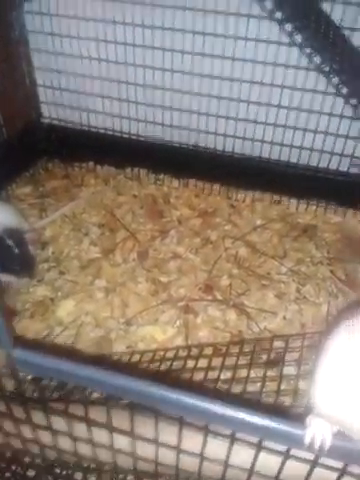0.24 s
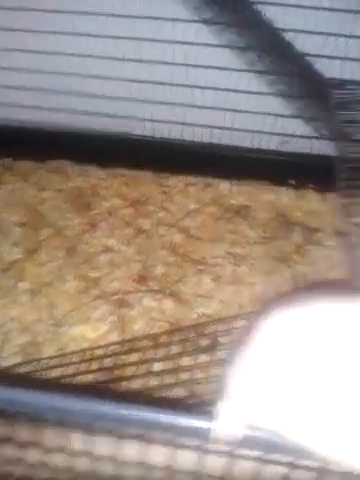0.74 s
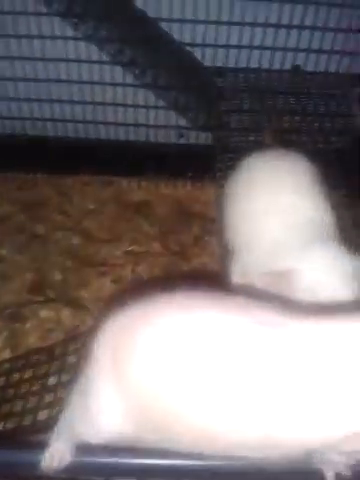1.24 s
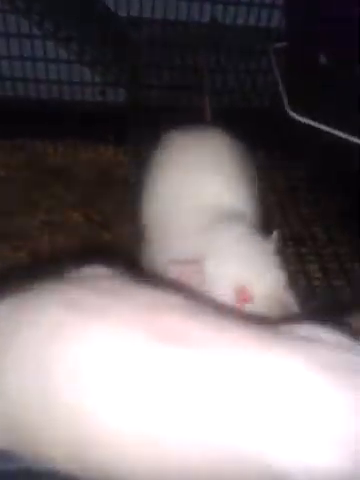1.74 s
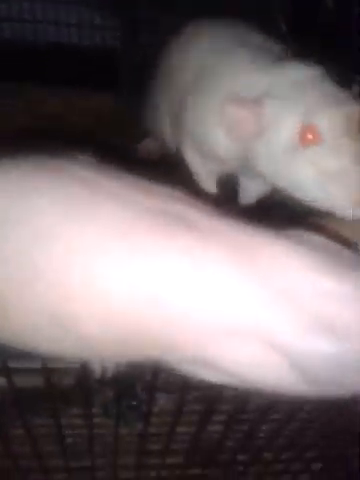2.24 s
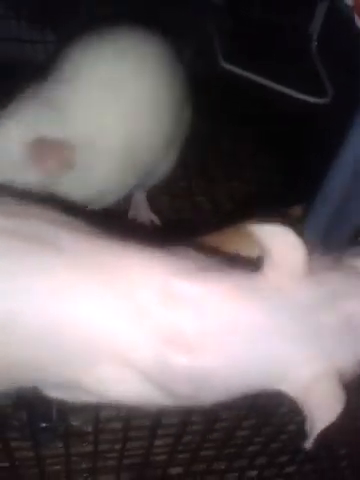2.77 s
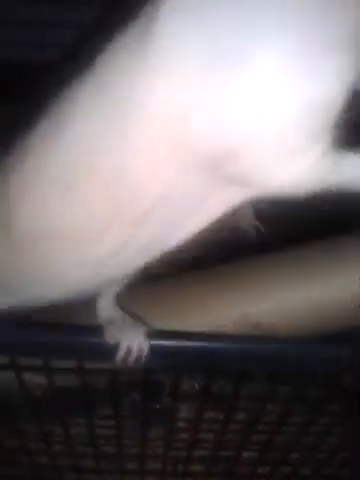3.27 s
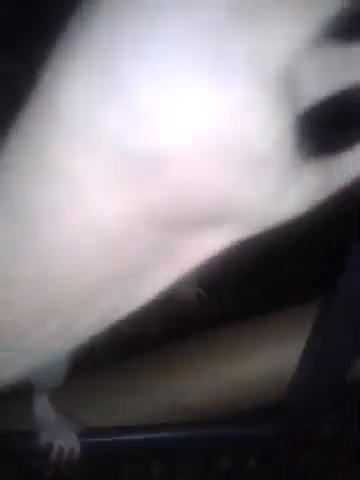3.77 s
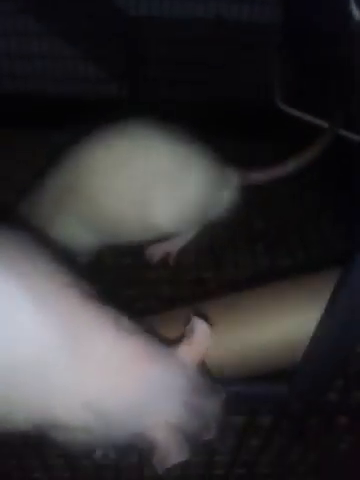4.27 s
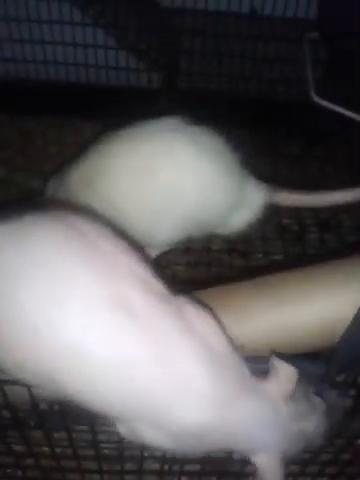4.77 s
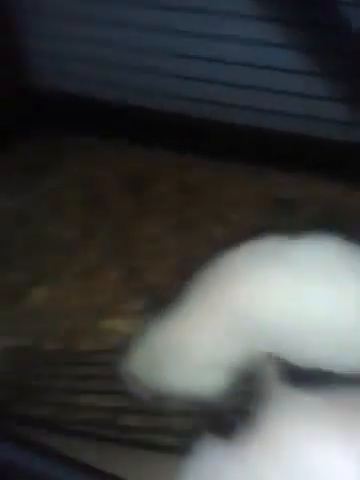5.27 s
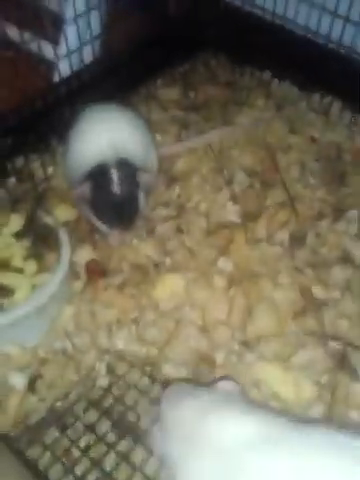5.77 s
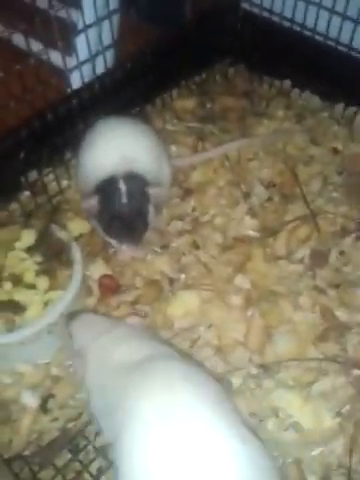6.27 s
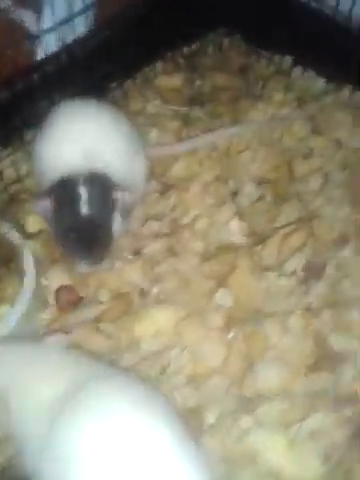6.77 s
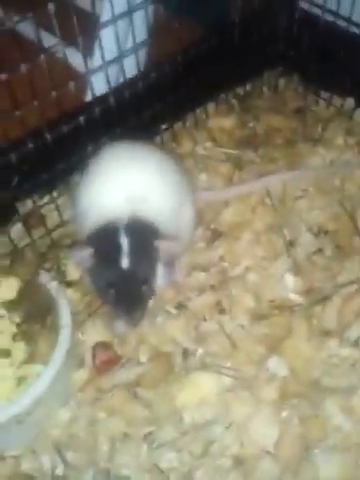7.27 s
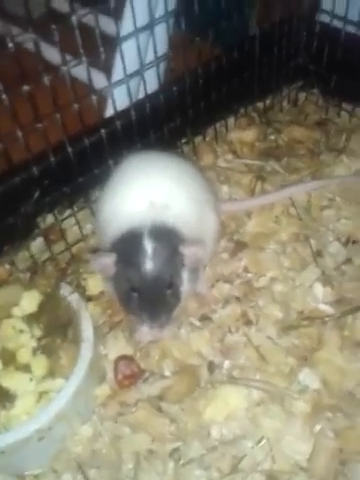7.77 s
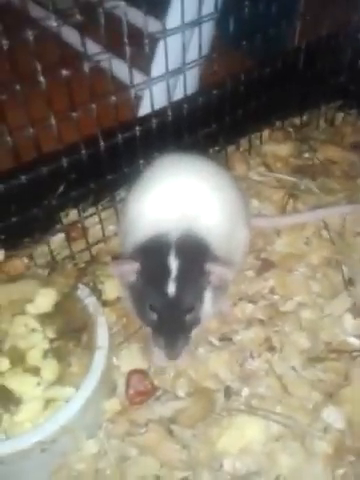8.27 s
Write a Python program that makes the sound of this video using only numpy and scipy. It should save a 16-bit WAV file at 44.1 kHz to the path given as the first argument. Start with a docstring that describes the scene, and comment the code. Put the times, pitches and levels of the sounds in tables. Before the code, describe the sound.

A low appliance hum, airy hiss and thin constant whine sit beneath patchy, dry litter rustle and a faint fuzzy tone early on. Small claws tick and scuff, gradually more often, until a dense burst rings the cage wires and knocks a hollow tube. The activity then sinks away, leaving light taps and a final little scrabble, heard close up in a small room.

```python
"""Rats in a wire cage indoors, close to a phone, over appliance hum, hiss and a thin whine that never stop.
Patchy rustling in wood shavings and soft claw scratches open, with a faint tone at the start and near 1 s.
After a lull around 2 s the rustle returns, with claw ticks and dragging scuffs that gradually thicken.
From 5.3 to 6.9 s bursts of claws ring the wire mesh and a hollow tube. The rustle then sinks away, a few
soft taps and scratches follow, and one last short burst of claws and rustle comes near 8.4 s."""
import sys
import numpy as np
from scipy import signal
from scipy.fft import rfft, irfft, next_fast_len
from scipy.io import wavfile
from scipy.ndimage import map_coordinates

SR = 44100
rng = np.random.default_rng(int(sys.argv[2]) if len(sys.argv) > 2 else 0)


def log_audio(samples):
    """Write samples as a 16-bit WAV file to the path given in sys.argv[1]."""
    # one column per channel
    frames = np.atleast_2d(samples).T
    # limit to full scale, then quantise
    limited = np.clip(frames, -1, 1)
    pcm = np.round(limited * 32767).astype(np.int16)
    wavfile.write(sys.argv[1], SR, pcm)


N = 375291


def amp(db):
    """Gain of a level in dB."""
    return 10 ** (np.asarray(db) / 20)


def unit(x):
    """Scaled to rms 1."""
    return x / np.sqrt(np.mean(x ** 2) + 1e-20)


def along(points, hz):
    """Reads (freq_hz, value) points at any frequency, on a log axis."""
    point_hz, value = np.transpose(points)
    return np.interp(np.log(hz + 1), np.log(point_hz + 1), value)


def wobble(rate):
    """A smooth random curve, rate knots a second."""
    return map_coordinates(rng.standard_normal(int(N * rate / SR) + 4), [np.arange(N) * rate / SR])


def filtered(x, response):
    """x shaped by a complex response of frequency."""
    n = x.shape[-1]
    padded = next_fast_len(n + 4096)
    return irfft(rfft(x, padded) * response(np.fft.rfftfreq(padded, 1 / SR)), padded)[..., :n]


def modes(table, f, spread_db=0):
    """A causal sum of resonances with alternating sign, each strength varied at random by spread_db."""
    total = 0
    change_db = spread_db * rng.standard_normal(len(table))
    for k, (center, width, db) in enumerate(table):
        resonance = 1j * f * width / (center * center - f * f + 1j * f * width)
        total = total + (-1) ** k * amp(db + change_db[k]) * resonance
    return total


def grit(count, grain_s, depth_db):
    """Noise broken into grains of unequal size: many flakes slipping at once."""
    step = max(grain_s * SR, 1)
    sizes = np.minimum(rng.exponential(size=int(count / step) + 3), 3)
    size = np.interp(np.arange(count) / step, np.arange(len(sizes)), sizes)
    return unit(amp(depth_db * size) * rng.standard_normal(count))


def treble(f, corner_hz=6500):
    """The share of a sound that lies above the corner."""
    return 1 / (1 + (corner_hz / (f + 1)) ** 8)


# Colour of the room air and hiss: freq_hz [Hz], density_db [dB per Hz, relative]
AIR_COLOUR = [(20, 1), (60, -8), (120, -4.5), (190, -0.5), (400, -1), (600, -3.5), (1150, -11), (2350, -11),
              (5800, -16.5), (7000, -21.5), (16500, -12.5)]


def room_air():
    """Room air and recorder hiss: coloured noise whose level drifts slightly."""
    hiss = unit(filtered(rng.standard_normal(N), lambda f: amp(along(AIR_COLOUR, f))))
    return amp(-59.5 + 0.64 * wobble(3.7)) * hiss


MOTOR_HZ = 58.44
# Harmonics of the appliance motor: multiple [of MOTOR_HZ], level_db [dB rms before the swell]
MOTOR_ORDERS = [(3, -81.5), (4, -77), (5, -75), (6, -72.5), (7, -73), (9, -83)]


def motor_hum():
    """Motor orders share one slightly wandering rotation; each swells on its own."""
    turn = 2 * np.pi * np.cumsum(MOTOR_HZ * (1 + 0.00215 * wobble(1.603))) / SR
    hum = np.zeros(N)
    for multiple, db in MOTOR_ORDERS:
        swell = amp(2.5 * wobble(9))
        hum += amp(db) * swell * np.sin(round(multiple) * turn + rng.uniform(0, 2 * np.pi))
    return np.sqrt(2) * hum  # sine peak from rms


# One thin whine: pitch_hz [Hz], level_db [dB rms before the flicker]
THIN_WHINE = (6375, -71)


def whine():
    """A constant high sine, flickering a little in level and phase."""
    pitch_hz, level_db = THIN_WHINE
    t = np.arange(N) / SR
    flicker = amp(1.2 * wobble(8))
    return np.sqrt(2) * amp(level_db) * flicker * np.sin(2 * np.pi * pitch_hz * t + wobble(12))


# Path of a faint tone: time_s [s], pitch_hz [Hz], level_db [dB rms]
TONE_PATH = [(0, 1880, -72), (0.1, 1900, -75), (0.2, 1900, -95), (0.88, 1740, -95), (0.97, 1750, -75),
             (1.25, 1850, -76), (1.5, 1900, -75), (1.65, 1900, -95)]


def faint_tone():
    """A thin gliding tone, made fuzzy by quick wavers of strength and phase."""
    time_s, pitch_hz, level_db = np.transpose(TONE_PATH)
    t = np.arange(N) / SR
    phase = 2 * np.pi * np.cumsum(np.interp(t, time_s, pitch_hz)) / SR + 2.2 * wobble(90)
    fuzzy = amp(5 * wobble(60)) * np.sin(phase)
    return amp(np.interp(t, time_s, level_db)) * unit(fuzzy)


# Decay of the room: freq_hz [Hz], t60_s [s]
WALL_DECAY = [(200, 0.47), (10000, 0.059)]


def walls(x):
    """Room echo: a noise tail in which each frequency dies at its own speed."""
    hz, t, noise = signal.stft(rng.standard_normal(SR // 2), SR, nperseg=256)
    decay = amp(-60 * t / along(WALL_DECAY, hz)[:, None])
    tail = signal.istft(noise * decay, SR, nperseg=256)[1]
    delayed = np.pad(x, (300, 0))  # samples before the first reflection
    return signal.fftconvolve(delayed, tail / np.linalg.norm(tail))[:N]


# Colour of wood shavings under paws and claws: freq_hz [Hz], density_db [dB per Hz, relative]
SHAVINGS_COLOUR = [(90, -52), (200, -12.5), (400, 0), (490, -10.5), (700, -5), (1330, -3), (1800, -1.5),
                   (3000, 1.5), (4200, 0.5), (6000, -3.5), (7500, -11), (17300, -20)]


def shuffling():
    """Other rats shift far off in the bedding: coarse grains under faint random swells."""
    swells = amp(4 * wobble(9) + 3 * wobble(40))
    grains = swells * grit(N, grain_s=0.0017, depth_db=6.5)
    flakes = filtered(grains, lambda f: amp(along(SHAVINGS_COLOUR, f)))
    return amp(-70.0) * unit(flakes)


# Where the paws stand: time_s [s], wire_share [0-1, power share of the rustle from paws on wire]
WIRE_SHARE = [(3.5, 0.22), (3.9, 0.046), (5.1, 0.13), (5.3, 1), (6.9, 0.63), (7.1, 0.33)]


def on_mesh(t):
    """Share of the paws that stand on wire."""
    return np.interp(t, *np.transpose(WIRE_SHARE))


# Steady rustle as the rats come and go: time_s [s], level_db [dB]
RUSTLE_LEVEL = [(0.0, -59.5), (0.46, -73), (0.64, -54.5), (0.85, -73), (1.0, -58.5), (1.5, -76.5),
                (1.8, -99), (2.2, -58.5), (3.15, -58.5), (3.4, -62.5), (3.86, -72), (3.98, -54),
                (4.47, -55), (5.3, -54.5), (6.07, -55.5), (6.33, -43.5), (6.7, -46.5), (6.95, -53),
                (7.15, -91), (7.37, -63.5), (7.93, -85), (8.44, -54), (8.51, -63)]
# A paw or belly dragged through the litter: full_s [s, reaches full strength], hold_s [s], level_db [dB]
DRAGS = [(0.97, 0.04, -60.5), (2.662, 0.037, -50), (2.837, 0.014, -40), (3.239, 0.046, -37),
         (3.911, 0.03, -50.5), (4.523, 0.061, -50.5), (4.969, 0.089, -39), (5.395, 0.058, -43),
         (5.544, 0.16, -36.5), (5.923, 0.042, -45.5), (6.137, 0.037, -37.5), (6.244, 0.029, -29),
         (6.597, 0.034, -42), (6.783, 0.086, -36)]
SCUFF_RISE_DB_PER_S, SCUFF_FADE_DB_PER_S = 450, 307


def effort(t):
    """The steady rustle plus scuffs that rise, hold and fade, summed in power and given as a gain."""
    power = amp(np.interp(t, *np.transpose(RUSTLE_LEVEL))) ** 2
    for full_s, hold_s, level_db in DRAGS:
        rise_db = SCUFF_RISE_DB_PER_S * np.maximum(full_s - t, 0)
        fade_db = SCUFF_FADE_DB_PER_S * np.maximum(t - full_s - hold_s, 0)
        power += amp(level_db - rise_db - fade_db) ** 2
    return np.sqrt(power)


# Ringing of the wire mesh: freq_hz [Hz], width_hz [Hz], level_db [dB]
MESH_MODES = [(1750, 90, -2), (2020, 80, -2), (2340, 70, -2), (2740, 90, 0), (3090, 120, -2),
              (3390, 120, -1), (4190, 80, 1), (4760, 70, -4)]
# Ringing of the air in the hollow tube: freq_hz [Hz], width_hz [Hz], level_db [dB]
TUBE_MODES = [(600, 90, -10), (1075, 55, 0)]
HOLLOW_LITTER_DB, HOLLOW_WIRE_DB = -14.5, -8  # tube under the rustle, paws in litter and paws on wire


def rustle():
    """Fur brushes smoothly through flakes; paws on the wire floor scrabble in clumps and ring it and the tube."""
    t = np.arange(N) / SR
    share = on_mesh(t)
    paws = grit(N, grain_s=.0025, depth_db=3) * amp(1.8 * wobble(25) + 1.5 * wobble(70))
    fur = grit(N, grain_s=.001, depth_db=2.5) * amp(1.4 * wobble(20))

    def wire_colour(f):
        return amp(along(SHAVINGS_COLOUR, f)) * (.85 + modes(MESH_MODES, f))

    def fur_colour(f):
        return amp(along(SHAVINGS_COLOUR, f)) * modes([(4550, 22000, 0)], f)  # fine hairs sound higher

    wire = unit(filtered(paws, wire_colour))
    brush = unit(filtered(fur, fur_colour))
    hollow = unit(filtered(paws, lambda f: modes(TUBE_MODES, f)))
    tube_db = HOLLOW_LITTER_DB + (HOLLOW_WIRE_DB - HOLLOW_LITTER_DB) * share
    return effort(t) * (np.sqrt(share) * wire + np.sqrt(1 - share) * brush + amp(tube_db) * hollow)


# A paw landing on the tube: peak_s [s], level_db [dB, top rms], length_s [s]
TUBE_LANDINGS = [(0.939, -65, .014), (2.515, -64, .025), (3.702, -60, 0.0087), (5.37, -48, .01),
                 (5.411, -45, .006), (5.601, -37, .008), (5.637, -38, 0.025), (5.704, -46, .008),
                 (5.791, -51.5, 0.0091), (5.856, -41, 0.0071), (5.96, -44, .01), (6.017, -51, .007),
                 (6.058, -48, .005), (6.117, -37, .006), (6.146, -41, 0.011), (6.165, -37, 0.0076),
                 (6.2, -38, .008), (6.587, -47, 0.01), (6.62, -41, 0.0099), (6.672, -37, 0.0038),
                 (6.802, -33.5, 0.0066), (8.355, -52, .004)]
# A paw landing on a loose thing: peak_s [s], level_db [dB, top rms], length_s [s], pitch_hz [Hz]
LOOSE_LANDINGS = [(1.415, -64, .025, 980), (1.926, -60, .007, 676), (2.852, -47, .007, 835),
                  (3.235, -53, .015, 870), (3.52, -57, 0.013, 550), (4.956, -56, 0.022, 348),
                  (5.06, -49.5, 0.023, 350), (5.16, -46, 0.008, 400), (7.404, -54.5, .01, 720),
                  (7.579, -56, 0.021, 510)]
LOOSE_WIDTH_HZ = 75


def taps():
    """Each landing is a short soft push that rings the tube or one hollow note."""
    lead = SR // 20  # samples before the peak of the push
    out, t = np.zeros(N + SR), np.arange(-lead, SR // 8) / SR
    landings = [(*row, TUBE_MODES) for row in TUBE_LANDINGS]
    landings += [(*row, [(pitch_hz, LOOSE_WIDTH_HZ, 0)]) for *row, pitch_hz in LOOSE_LANDINGS]
    for peak_s, level_db, length_s, body in landings:
        push = np.exp(-(t / length_s) ** 2)
        note = filtered(push * grit(len(t), grain_s=0.00087, depth_db=3.5), lambda f: modes(body, f))
        note *= np.linalg.norm(push) / np.linalg.norm(note)  # same energy as the push
        out[round(peak_s * SR):][:len(t)] += amp(level_db) * note
    return out[lead:lead + N]


# A claw snapping off a wire: peak_s [s], level_db [dB, top rms], pitch_hz [Hz], fall_s [s],
# bright_db [dB, treble tilt]
CLAW_TICKS = [(2.641, -48.5, 3480, 0.015, 12), (2.799, -42, 2780, 0.011, -1), (3.141, -52, 2590, 0.053, 8),
              (3.23, -39.5, 2800, 0.031, -19), (3.441, -50, 3530, 0.0086, -8), (3.696, -52, 2450, 0.011, 7),
              (4.423, -42, 3150, 0.0055, -9), (4.503, -35, 5200, 0.015, 12),
              (4.614, -40.5, 3530, 0.029, -1), (4.948, -40, 3420, 0.042, -10),
              (5.361, -31, 3270, 0.014, 5.5), (5.409, -38, 3230, .007, -11), (5.529, -36, 2740, 0.011, 8),
              (5.833, -43.5, 3450, 0.005, -1), (6.054, -47, 3380, .0073, -6),
              (6.078, -38, 2740, 0.0069, -29), (6.196, -22.5, 4100, 0.012, 6.5),
              (6.399, -39.5, 2910, 0.041, -1), (6.505, -36, 4220, 0.012, -4),
              (6.574, -29, 3870, 0.0073, -1), (6.671, -25.5, 3310, 0.004, 5),
              (6.724, -30.5, 3900, 0.0061, 2), (6.751, -28.5, 3980, .0033, 1), (6.77, -33, 3320, 0.012, 6),
              (6.785, -29.5, 3340, 0.0098, 8), (6.836, -22, 3980, 0.0099, 8.5),
              (7.565, -52, 2460, 0.044, 1), (8.356, -44, 3270, 0.0043, -4), (8.411, -43, 2850, 0.017, 5)]
TICK_RISE_S = 0.00086
# A claw digging in and letting go: peak_s [s, deepest bite], level_db [dB, top rms], pitch_hz [Hz],
# rise_and_fall_s [s], bright_db [dB, treble tilt]
CLAW_STROKES = [(0.604, -50, 5230, 0.022, 8), (0.94, -52.5, 3620, 0.017, 4), (1.035, -58, 3880, .009, 10),
                (1.415, -60, 2220, 0.033, 5), (1.926, -57, 3460, 0.0089, 3), (2.04, -58, 3210, 0.0059, 8),
                (2.515, -53.5, 2880, 0.032, 0), (2.668, -47, 2430, .01, -3), (2.723, -46.5, 3600, 0.012, 1),
                (2.84, -37, 4370, 0.0074, -26), (2.853, -35.5, 3050, 0.0084, -26),
                (2.983, -49.5, 3600, 0.029, 2), (3.265, -40, 1680, 0.032, -16),
                (3.52, -50.5, 1900, 0.013, -9), (3.581, -53.5, 2550, 0.0062, 5),
                (3.931, -50.5, 4930, 0.023, 9), (4.789, -46.5, 3160, 0.0096, 4),
                (5.138, -49, 3890, 0.0057, 3), (5.157, -35.5, 3230, 0.0058, 6),
                (5.326, -54, 3480, 0.0092, -2), (5.433, -31, 3290, 0.012, 9),
                (5.598, -34.5, 2900, 0.0086, -1), (5.637, -34.5, 3380, 0.027, -29),
                (5.679, -30.5, 3370, .009, 5), (5.702, -36, 2750, 0.0073, 1),
                (5.733, -37, 3360, 0.0044, -8), (5.792, -51, 2490, 0.0072, 0), (5.817, -49, 3250, .009, -7),
                (5.857, -37.5, 3380, 0.0067, -8), (5.96, -36, 3350, 0.0087, -17),
                (6.017, -58, 3350, .007, 1), (6.117, -32, 4450, 0.0074, -1.5),
                (6.146, -26.5, 3360, 0.012, 2.5), (6.164, -27, 3300, 0.0043, 5),
                (6.227, -26, 3240, 0.0077, 6), (6.245, -20.5, 4280, 0.018, 0),
                (6.355, -37, 3930, 0.0076, -5), (6.471, -41.5, 3700, 0.028, -9),
                (6.544, -43, 3960, 0.0076, -12), (6.59, -30.5, 3380, 0.0088, 8),
                (6.619, -31.5, 3980, 0.0061, 3), (6.802, -33, 2750, .0065, 3),
                (6.815, -25.5, 2420, 0.007, 2), (7.405, -56.5, 2520, 0.02, -2),
                (8.371, -40, 3700, .009, 7.5), (8.442, -44.5, 2860, 0.014, 6)]
# Ringing of the floor tray: freq_hz [Hz], width_hz [Hz], level_db [dB]
TRAY_MODES = [(370, 75, 0), (560, 75, -5), (850, 75, -6)]
# knock level relative to a scratch of -40 dB; dB the knock gains per dB of scratch
KNOCK_DB, KNOCK_GROWS = -15.5, 0.4


def scratches():
    """Each claw digs in, grates and lets go; it rings the wires and knocks the tube beside the mesh or the tray."""
    lead = SR // 20  # samples before the moment of deepest bite
    out, t = np.zeros(N + SR), np.arange(-lead, SR // 8) / SR
    claws = [(*row, TICK_RISE_S) for row in CLAW_TICKS] + [(*row, row[3]) for row in CLAW_STROKES]
    for peak_s, level_db, pitch_hz, fall_s, bright_db, rise_s in claws:
        bite = np.exp(-(t / rise_s) ** 2)
        release = np.exp(-(t / fall_s) ** 2) + 0.11 * np.exp(-t / (2 * fall_s))
        stroke = np.where(t < 0, bite, release)
        force = stroke * grit(len(t), grain_s=0.00093, depth_db=3.2)
        share = on_mesh(peak_s)

        def grate_colour(f):
            mesh = .5 + np.sqrt(share) * modes(MESH_MODES, f, spread_db=5)
            nearest_wire = modes([(pitch_hz, 260, 6)], f)  # sings most
            return amp(along(SHAVINGS_COLOUR, f) + bright_db * treble(f)) * (mesh + nearest_wire)

        def knock_colour(f):
            return share * modes(TUBE_MODES, f) + (1 - share) * modes(TRAY_MODES, f, spread_db=6.5)

        def scale(v):  # same energy as the stroke
            return v * np.linalg.norm(stroke) / np.linalg.norm(v)

        grate = scale(filtered(force, grate_colour))
        knock = scale(filtered(force, knock_colour))
        knock_db = KNOCK_DB + (KNOCK_GROWS - 1) * (level_db + 40)
        out[round(peak_s * SR):][:len(t)] += amp(level_db) * (grate + amp(knock_db) * knock)
    return out[lead:lead + N]


def scene():
    """The room, then the rats and their echo."""
    room = room_air() + motor_hum() + whine() + faint_tone()
    rats = shuffling() + rustle() + taps() + scratches()
    echo = amp(-16) * walls(rats)
    return (room + rats + echo)[None]


TOP_HZ = 17330  # band limit of the phone


def record(dry):
    """The phone thins the bass below 120 Hz and keeps nothing above its band limit."""
    return filtered(dry, lambda f: (f < TOP_HZ) * (1j * f / (120 + 1j * f)))


dry = scene()
out = record(dry)
log_audio(out)
```